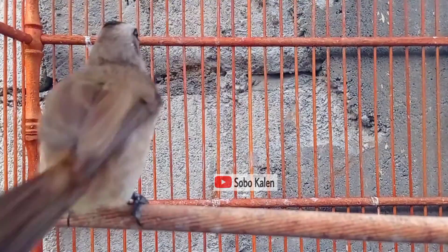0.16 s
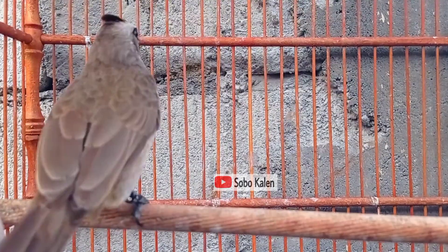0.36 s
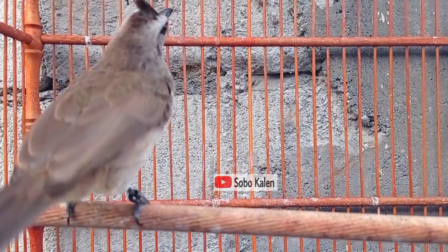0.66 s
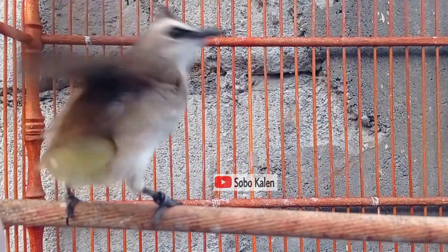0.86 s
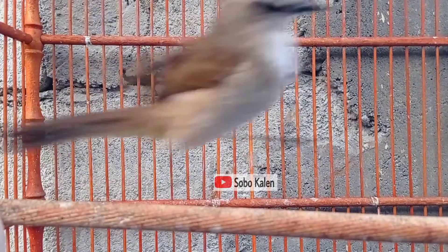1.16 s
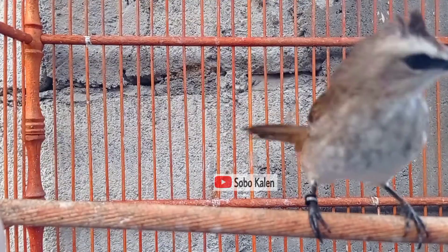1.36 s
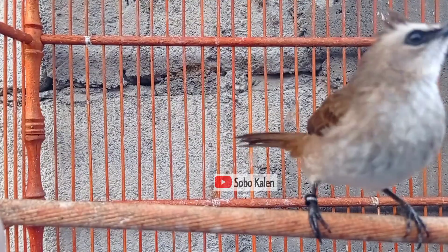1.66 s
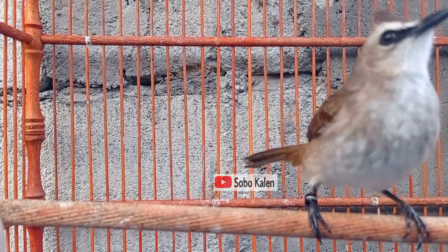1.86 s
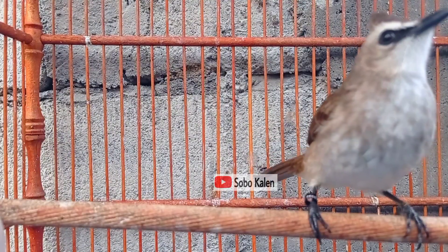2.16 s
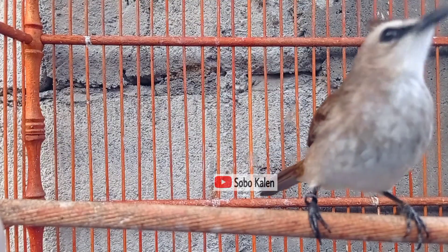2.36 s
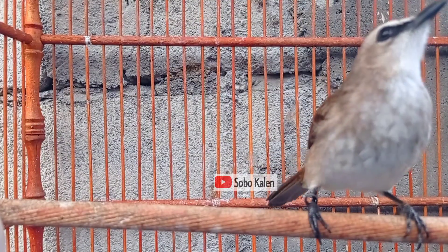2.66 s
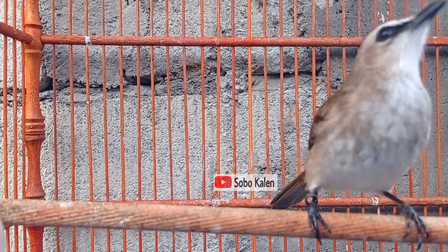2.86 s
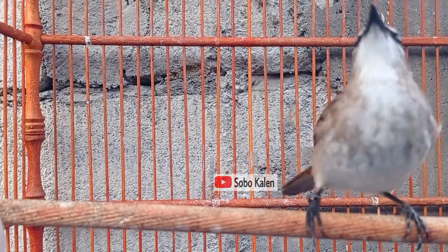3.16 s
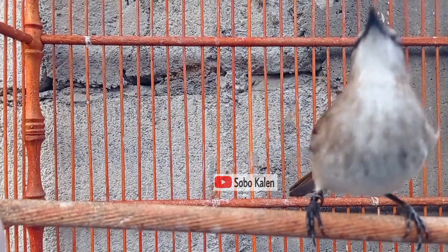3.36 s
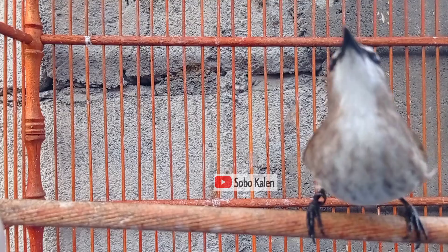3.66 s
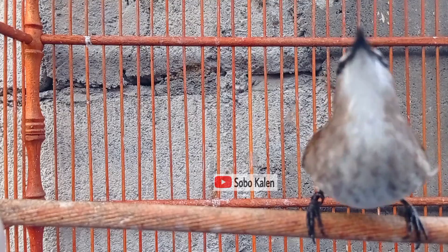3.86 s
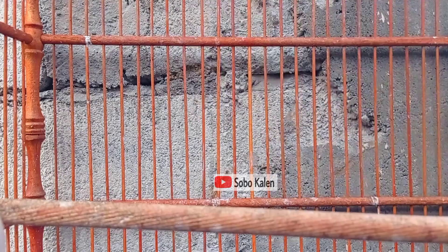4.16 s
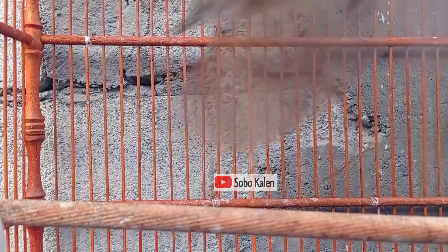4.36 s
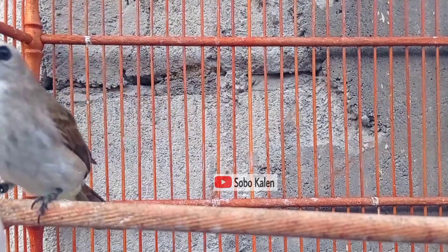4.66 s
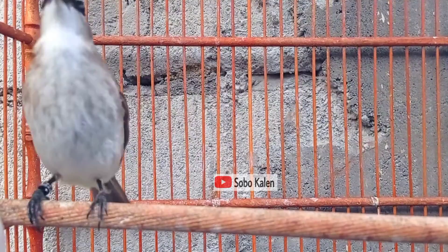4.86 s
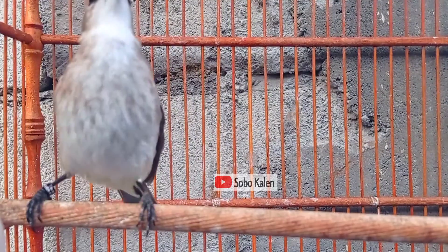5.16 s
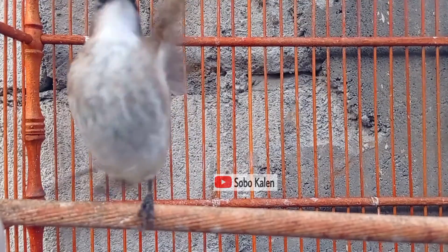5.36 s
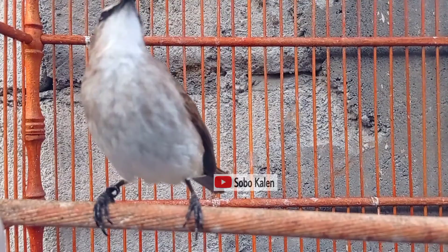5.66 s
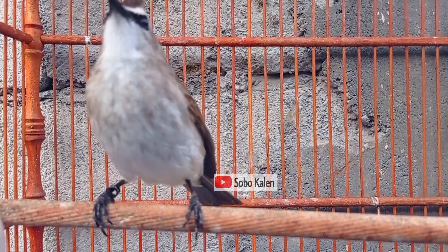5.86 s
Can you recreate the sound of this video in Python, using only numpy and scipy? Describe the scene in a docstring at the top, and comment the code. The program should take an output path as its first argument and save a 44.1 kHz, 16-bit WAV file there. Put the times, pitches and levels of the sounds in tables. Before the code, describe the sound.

In a quiet, echoing yard, a caged bird very near the microphone gives one loud, slightly overloaded chip. Faint claw ticks on wood and metal bars follow, while a distant bird whistles winding phrases. Past four seconds, wings flutter up and back with feather swish and low air buffets, then a hard landing coincides with a second, raspy chip. Two more chips ring out and the yard goes quiet.

```python
"""Quiet, echoing yard: a caged bulbul gives four sharp chips so close that they overload the microphone.
Each chip is a gliding, wobbling sine with a rasp and hiss, bounced around the cage and rung in the yard.
The bird shuffles (noise ringing wood and bars), then flies up and back: noise pulses at the wingbeat rate
as feather swish and as draught on the microphone, with low buffets and the jolts of landing.
Other birds, gliding sines with echoes, call over a faint rumble and hiss with brief scheduled ducks."""
import sys
import numpy as np
from scipy import signal
from scipy.fft import rfft, irfft
from scipy.io import wavfile
from scipy.ndimage import map_coordinates

SR = 44100
rng = np.random.default_rng(int(sys.argv[2]) if len(sys.argv) > 2 else 0)


def unload_wav(signal):
    """Save mono or channel-first audio to the path in sys.argv[1] as 16-bit WAV at rate SR, clipped to [-1, 1]."""
    wavfile.write(
        sys.argv[1],
        SR,
        np.round(np.clip(np.atleast_2d(signal).T, -1, 1) * 32767).astype(np.int16),
    )


N = 265212
TIME = np.arange(N) / SR


def undb(db):
    """Decibels to gain."""
    return 10 ** (np.asarray(db) / 20)


def unit(x):
    """Scale to rms 1."""
    return x / np.sqrt(np.mean(x ** 2))


def add(track, start_s, sound):
    """Mix a sound into a track at a time; a negative time becomes 0."""
    i = max(int(start_s * SR), 0)
    track[i:i + len(sound)] += sound[:max(N - i, 0)]


def oscillator_phase(hz):
    """Phase [rad] of a tone with a varying frequency."""
    return 2 * np.pi * np.cumsum(hz) / SR


def noise(spectrum):
    """Rms-1 noise shaped by (frequency [Hz], relative level [dB]) points, falling steeply beyond the ends."""
    hz, db = np.transpose(spectrum)
    f = np.fft.rfftfreq(N, 1 / SR) + 1  # +1 Hz avoids log(0)
    upper_skirt = 1 / (1 + (f / hz[-1] / 2) ** 4)
    lower_skirt = 1 / (1 + (hz[0] / f / 2) ** 4)
    shape = undb(np.interp(np.log(f), np.log(hz), db))
    white = rfft(rng.standard_normal(N))
    return unit(irfft(white * upper_skirt * lower_skirt * shape, N))


def band(x, hz, width_hz):
    """One resonance, gain 1 at its centre."""
    return signal.lfilter(*signal.iirpeak(min(hz, .45 * SR), hz / width_hz, SR), x)


def ring(force, modes):
    """A body's resonances, each filtered twice to leave dark valleys between them."""
    return sum(undb(db) * band(band(force, hz, width_hz), hz, width_hz) for hz, width_hz, db in modes)


def walk(t, rate_hz):
    """Smooth random motion through about unit-spread points at a given rate."""
    steps = rng.standard_normal(int(t[-1] * rate_hz) + 2)
    return map_coordinates(steps, [t * rate_hz], order=3, mode="nearest")


def yard_echo(x, t60_s, rise_s):
    """Diffuse reverberation: a noise tail that builds up and dies away."""
    t = TIME[:SR]
    decay = np.exp(-np.log(1000) * t / t60_s)
    buildup = 1 - np.exp(-(t / rise_s) ** 2)
    tail = rng.standard_normal(SR) * decay * buildup
    return signal.fftconvolve(x, tail / np.linalg.norm(tail))[:N]


# yard air: (frequency [Hz], relative level [dB per Hz])
YARD_SPECTRUM = [(18, -38), (30, -3.5), (99, 0.5), (320, -10.5), (472, -13.5), (597, -14.5), (928, -18),
                 (1520, -17.5), (2250, -19), (2430, -20), (3780, -27), (5030, -27), (6300, -27.5),
                 (7500, -39), (8600, -33), (9700, -44), (15000, -48)]
# the recorder's noise suppressor turns the background down:
# (time [s], length [s], rumble change [dB], hiss change [dB])
DUCKS = [(.31, .26, -9, -7.5), (1.099, .04, -5, -12), (1.92, .31, -13, -12.5), (4.854, .57, -9.5, -7),
         (5.577, .5, -7, -5), (5.713, .08, -14.5, -9)]
RUMBLE_DB, HISS_DB, STEADY_DB = -61, -68.5, -80.5
DUCK_FALL_S, DUCK_RECOVER_S = .035, .16


def background():
    """Outdoor rumble and hiss, ducked at listed times as by a noise suppressor, over thin steady hiss."""
    rumble_db, hiss_db = RUMBLE_DB, HISS_DB
    for start, length, rumble_duck_db, hiss_duck_db in DUCKS:
        fall = (TIME - start) / DUCK_FALL_S
        recovery = 1 - (TIME - start - length) / DUCK_RECOVER_S
        duck = np.clip(np.minimum(fall, recovery), 0, 1)
        rumble_db = rumble_db + rumble_duck_db * duck
        hiss_db = hiss_db + hiss_duck_db * duck
    air = noise(YARD_SPECTRUM)
    rumble = signal.sosfiltfilt(signal.butter(2, 450, fs=SR, output="sos"), air)
    hiss = unit(air - rumble) * undb(hiss_db + walk(TIME, 5.2))
    steady = undb(STEADY_DB) * rng.standard_normal(N)
    return undb(rumble_db) * unit(rumble) + hiss + steady


def distant_birds(notes, warble, warble_hz, direct_db, t60_s):
    """Gliding, warbling whistles, each heard direct and through echoes; warble is a share of pitch."""
    out = np.zeros(N)
    for start, length, from_hz, to_hz, db in notes:
        t = TIME[:int(length * SR)]
        hz = np.linspace(from_hz, to_hz, len(t)) * (1 + warble * walk(t, warble_hz))
        whistle = signal.windows.tukey(len(t), .5) * np.sin(oscillator_phase(hz))
        add(out, start, undb(db) * whistle)
    return undb(direct_db) * out + yard_echo(out, t60_s, rise_s=.0013)


# thin whistles: (time [s], length [s], start pitch [Hz], end pitch [Hz], level [dB])
THIN_NOTES = [(.07, 0.12, 4240, 3800, -64.5), (4.98, 0.15, 4370, 4226, -64),
              (5.87, 0.086, 2556, 2626, -62.5), (5.95, 0.06, 4500, 4500, -63)]


def thin_whistles():
    """Thin whistles further off, steady but for a slight warble."""
    return distant_birds(THIN_NOTES, warble=.018, warble_hz=100, direct_db=1, t60_s=.35)


# faint low calls: (time [s], length [s], start pitch [Hz], end pitch [Hz], level [dB])
LOW_NOTES = [(1.47, 0.31, 653, 599.5, -67.5), (1.82, 0.061, 631, 601, -61.5),
             (2.31, 0.18, 579, 635.4, -53.5), (5.322, 0.053, 587, 619, -49), (5.60, 0.078, 677, 830, -57.5)]


def low_calls():
    """Faint low calls from further away, with an unsteady pitch."""
    return distant_birds(LOW_NOTES, warble=.074, warble_hz=131.2, direct_db=-1, t60_s=.24)


# song phrases: (time [s], length [s], first pitch [Hz], turning pitch [Hz], level [dB], fade [dB per s])
FAR_PHRASES = [(0, 0.22, 2060, 1736, -59.5, 2.5), (.45, 0.51, 2172, 1472, -59.5, -2.5),
               (1.35, 0.5, 1760, 1381, -65, 7), (2.57, 0.22, 2096, 1692, -54.5, 5),
               (2.84, .29, 1701, 2276, -47.5, 6), (3.13, 0.37, 2299, 1607, -44, 10.5),
               (3.605, .24, 1893, 2258, -42, 28.5), (5.85, .08, 1500, 1933, -66, 0)]
NOTE_S, NOTE_OVERLAP, NOTE_SCATTER = .09, 1.2, .016  # usual spacing; length over spacing; share of pitch


def distant_song():
    """A distant bird's phrases: runs of notes that glide to and fro between two pitches."""
    notes = []
    for start, length, first_hz, turn_hz, db, fade in FAR_PHRASES:
        count = max(round(length / NOTE_S), 1)
        step = length / count
        for k in range(count):
            glide_hz = np.array([turn_hz, first_hz] if k % 2 else [first_hz, turn_hz])
            ends_hz = glide_hz * (1 + NOTE_SCATTER * rng.standard_normal(2))
            notes.append((start + k * step, NOTE_OVERLAP * step, *ends_hz, db - fade * k * step))
    return distant_birds(notes, warble=.05, warble_hz=200, direct_db=-10, t60_s=.7)


# another cage bird's chips: (time [s], length [s], start pitch [Hz], end pitch [Hz], level [dB])
HIGH_NOTES = [(3.27, .08, 4150, 3810, -56), (3.29, 0.076, 2654, 4473, -56), (3.380, 0.02, 4200, 3806, -36),
              (3.390, 0.0162, 3955, 3205, -42.5), (3.44, 0.027, 3985, 3550, -44)]


def other_cage_bird():
    """Sharp high chips of another cage bird, with a fast warble."""
    return distant_birds(HIGH_NOTES, warble=.051, warble_hz=790, direct_db=-1, t60_s=.33)


# hops, foot after foot: (time [s], gap between feet [s], wood drive [dB], bar drive [dB], decay [s])
HOPS = [(0.02, 0.041, -46, -64, 0.01), (0.689, .045, -52, -57, 0.033), (1.233, 0.046, -66, -50.5, 0.013),
        (1.364, 0.024, -44, -49.5, 0.017), (4.327, .026, -50.5, -38, 0.01),
        (4.494, 0.026, -17.5, -28, 0.0038), (5.539, 0.027, -46, -55.5, 0.0088)]
# claw or wing-tip touches: (time [s], wood drive [dB], bar drive [dB], decay [s])
TAPS = [(1.017, -52.5, -54.5, .012), (1.308, -57.5, -51, 0.029), (2.481, -65, -63, 0.017),
        (2.815, -73, -54, .033), (3.614, -72, -52, 0.015), (4.251, -24.5, -30, 0.0023),
        (4.445, -42.5, -38, .0066)]
# wooden perch and frame modes: (frequency [Hz], width per filter pass [Hz], relative gain [dB])
PERCH_MODES = [(470, 190, -3), (805, 240, -8), (1014, 82, 1), (1846, 120, -0.5), (2700, 300, -10.5)]
# cage bar modes: (frequency [Hz], width per filter pass [Hz], relative gain [dB])
BAR_MODES = [(3800, 380, -1), (4520, 330, 3.5), (6190, 350, 4.5), (7400, 430, -4), (9000, 1500, -12)]


def claws():
    """Short gritty scrapes ring the perch and the bars."""
    knock, scrape = np.zeros((2, N))
    t = TIME[:SR // 8]
    footfalls = [(start + lag, *touch) for start, gap, *touch in HOPS for lag in (0, gap)]
    for start, knock_db, scrape_db, decay in footfalls + TAPS:
        grit = undb(.83 * walk(t, 600)) * np.exp(-t / decay) * rng.standard_normal(len(t))
        add(knock, start, undb(knock_db) * grit)
        add(scrape, start, undb(scrape_db) * grit)
    cage = undb(14) * ring(knock, PERCH_MODES) + undb(6.5) * ring(scrape, BAR_MODES)
    return cage + undb(-11) * yard_echo(cage, t60_s=.11, rise_s=.01)


def bout(start_s, hold_s, rise_db_per_s, fade_db_per_s):
    """A gain that rises to 1, holds and fades, with straight slopes in dB."""
    before_s = np.maximum(start_s - TIME, 0)
    after_s = np.maximum(TIME - start_s - hold_s, 0)
    return undb(-rise_db_per_s * before_s - fade_db_per_s * after_s)


# wing bouts (a shake, up, back, wing brushing the bars on landing, folding):
# (time [s], feather level [dB], feather hold [s], draught level [dB], draught hold [s], fade [dB per s])
BOUTS = [(-.03, -49, 0.058, -42.5, 0.034, 191), (4.144, -40.5, 0.14, -25.5, 0.25, 260),
         (4.446, -38.5, 0.12, -23.5, 0.023, 146.5), (4.519, -27.5, 0.024, -40, .02, 381),
         (4.87, -57, .02, -61.5, .01, 248.5)]
# feather swish: (frequency [Hz], relative level [dB per Hz])
FEATHER_SPECTRUM = [(350, -31), (600, 2.5), (679, -9), (1100, -5), (1790, -9), (2000, -9), (3370, -14.5),
                    (6490, -12.5), (13600, -34), (14800, -26), (15800, -22.5)]
# draught on the microphone: (frequency [Hz], relative level [dB per Hz])
DRAUGHT_SPECTRUM = [(18, -46), (30, -14), (54, 3), (144, 3.5), (228, -12), (322, -4), (501, -16.5),
                    (590, -20), (684, -48), (1500, -61), (1950, -64.5), (3300, -120)]
WINGBEAT_HZ, SWISH_DEPTH_DB, DRAUGHT_DEPTH_DB = 32.38, 3, 4.7
WING_RISE_DB_PER_S, DRAUGHT_RISE_DB_PER_S = 2200, 650
DRAUGHT_LAG_S = .036  # pushed air arrives after the swish


def wings():
    """Every wingbeat swishes the feathers and pushes a puff of air at the microphone."""
    draught, feathers = np.zeros((2, N))
    for start, feather_db, hold, draught_db, draught_hold, fade in BOUTS:
        swish_gain = undb(feather_db) * bout(start, hold, WING_RISE_DB_PER_S, fade)
        puff_gain = undb(draught_db) * bout(start + DRAUGHT_LAG_S, draught_hold,
                                            DRAUGHT_RISE_DB_PER_S, fade)
        feathers = np.maximum(feathers, swish_gain)
        draught = np.maximum(draught, puff_gain)
    stroke = np.cos(oscillator_phase(WINGBEAT_HZ * (1 + .1 * walk(TIME, 14))))  # loosely timed
    flicker_db = 2 * walk(TIME, 380)
    swish = feathers * noise(FEATHER_SPECTRUM) * undb(SWISH_DEPTH_DB * stroke + flicker_db)
    return swish + draught * noise(DRAUGHT_SPECTRUM) * undb(DRAUGHT_DEPTH_DB * stroke)


def bursts(table, waver, waver_hz, overtone):
    """Short Gaussian jolts of unsteady, lopsided cycles; waver is a share of pitch."""
    out = np.zeros(N)
    t = TIME[:SR // 10]
    middle = t[len(t) // 2]
    for centre, db, hz, length in table:
        phase = oscillator_phase(hz * (1 + waver * walk(t, waver_hz)))
        overtones = np.sin(2 * phase) + np.sin(3 * phase) / 2 + np.sin(4 * phase) / 4
        cycles = np.sin(phase) + overtone * overtones
        envelope = np.exp(-((t - middle) / length) ** 2)
        add(out, centre - middle, undb(db) * envelope * cycles)
    return out


# strong downstrokes: (centre time [s], level [dB], eddy frequency [Hz], 1/e half-length [s])
GUSTS = [(4.283, -8.5, 166.4, 0.0042), (4.302, -13, 191, 0.0086), (4.346, -17.5, 218.3, 0.0073),
         (4.376, -8.5, 149, 0.014), (4.41, -20, 121.6, 0.0061), (4.180, -22.5, 126.9, 0.0083),
         (4.891, -35, 132.4, 0.0082)]


def buffets():
    """Strong downstrokes buffet the microphone with low, unsteady eddies."""
    return bursts(GUSTS, waver=.2, waver_hz=263, overtone=.13)


# cage hits: (centre time [s], level [dB], ring frequency [Hz], 1/e half-length [s])
LANDING_HITS = [(4.4962, -17.5, 535.4, 0.00099), (4.5120, -19, 2530, 0.0011), (4.5171, -11, 4460, 0.0011),
                (4.5188, -11, 486.7, 0.00074)]


def landing():
    """The bird hits the cage as it lands: very short jolts at the ring frequencies."""
    return bursts(LANDING_HITS, waver=.18, waver_hz=3430, overtone=.03)


CHIP_S, ENTRY_HZ, LIFT_RATIO = .0615, 3406, 1.055
DROP_S, CLIMB_S, CREST_S, TROUGH_S, SETTLE_S = .0075, .017, .027, .045, .021
ATTACK_S, HOLD_S, RELEASE_S, TIRE_DB_PER_S = .0105, .043, .0061, 380


def chip(opening_hz, crest_hz, trough_hz, catch_at_s, catch_s, catch_db, wobble_hz, wobble, rasp):
    """A whistle drops in, holds, moves to crest and trough, then lifts; it wobbles as the syrinx settles."""
    t = TIME[:int(CHIP_S * SR)]
    pitch_hz = np.interp(t, [0, DROP_S, CLIMB_S, CREST_S, TROUGH_S, CHIP_S],
                         [ENTRY_HZ, opening_hz, opening_hz, crest_hz, trough_hz, LIFT_RATIO * trough_hz])
    attack = np.sin(np.pi / 2 * np.minimum(t / ATTACK_S, 1)) ** 5
    release = np.sin(np.pi / 2 * np.minimum((CHIP_S - t) / RELEASE_S, 1)) ** 2
    voice_catch_db = catch_db * np.exp(-((t - catch_at_s) / catch_s) ** 2)
    level_db = voice_catch_db - TIRE_DB_PER_S * np.maximum(t - HOLD_S, 0)
    unsettled = 1 / (1 + (t / SETTLE_S) ** 8)
    swing = unsettled * np.cos(2 * np.pi * wobble_hz * (t - .0055))
    phase = oscillator_phase(pitch_hz * (1 + wobble * swing + .006 * walk(t, 400)))
    tone = np.sin(phase) + undb(-35) * np.sin(2 * phase)
    tone += undb(-60.5) * np.sin(4 * phase) - undb(-41.5) * np.sin(5 * phase)
    # the other side of the syrinx, unsteady, beats with the first
    second = np.sin(oscillator_phase(2900 * (1 + .16 * walk(t, 700))))
    choke = 1 - .75 * np.clip(-swing, 0, 1) ** 4  # at the bottom of each swing
    # air through the beak, most at the start
    hiss = unit(band(rng.standard_normal(len(t)), 3600, 2100)) * undb(-45 + 13 * unsettled)
    return attack * release * undb(level_db) * (choke * tone + rasp * unsettled * second + hiss)


# chips: (time [s], level [dB], send to yard echo re chip [dB], opening pitch [Hz], crest pitch [Hz],
# trough pitch [Hz], voice-catch time in chip [s], catch 1/e half-length [s], catch level change [dB],
# wobble rate [Hz], wobble depth [share of pitch], rasp [share of tone amplitude])
CHIPS = [(0.26, 0.5, -2.5, 2307, 2550, 2218, 0.05, .003, -5.5, 129, 0.12, 0.094),
         (4.518, 1.5, -5.5, 1857, 2277, 2122, .016, .004, -3, 128.3, .17, 0.38),
         (4.896, 0.5, 0.5, 2493, 2610, 2310, 0.023, 0.0023, -15, 127.7, .12, 0.16),
         (5.185, -1.5, 2, 2550, 2556, 2320, .023, 0.0056, -3, 122.5, .095, 0.12)]
# bounces off wall and cage floor: (delay [s], level re direct [dB])
BOUNCES = [(.0031, -32.5), (0.0151, -34.5), (0.0276, -23.5)]


def bulbul():
    """The chips, their bounces around the cage and their ring in the yard."""
    direct, outward = np.zeros((2, N))
    for start, db, echo_db, *shape in CHIPS:
        call = undb(db) * chip(*shape)
        add(direct, start, call)
        add(outward, start, undb(echo_db) * call)
    # the held part of the whistle is what mostly rings on
    held = band(band(outward, 2350, 780), 2350, 780) + undb(-18) * outward
    out = direct + undb(-25.5) * yard_echo(held, t60_s=.45, rise_s=.018)
    for delay, db in BOUNCES:
        add(out, delay, undb(db) * direct)
    return out


def scene():
    """The yard and its other birds behind the caged bird."""
    far = background() + thin_whistles() + low_calls() + distant_song() + other_cage_bird()
    near = claws() + wings() + buffets() + landing() + bulbul()
    return (far + near)[None]


CEILING, KNEE, TOP_HZ = .72, 8, 15800  # limit [full scale]; knee exponent; cut-off


def record(dry):
    """Microphone overload adds odd harmonics; the response has a bright edge and a cut top."""
    thinned = signal.sosfilt(signal.butter(4, 32, "high", fs=SR, output="sos"), dry)
    fine = signal.resample_poly(thinned, 4, 1, axis=1) / CEILING  # oversampled against aliasing
    flattened = CEILING * fine / (1 + np.abs(fine) ** KNEE) ** (1 / KNEE)
    out = signal.resample_poly(flattened, 1, 4, axis=1)
    bright = out + undb(-6.5) * band(out, 16000, 1600)
    return signal.sosfilt(signal.ellip(10, .2, 80, TOP_HZ, fs=SR, output="sos"), bright)


dry = scene()
out = record(dry)
unload_wav(out)
```